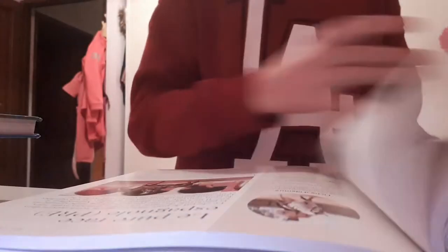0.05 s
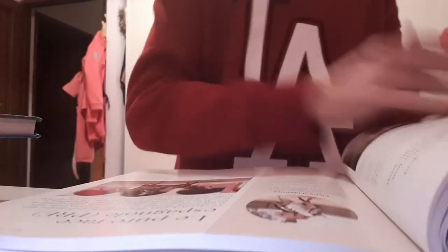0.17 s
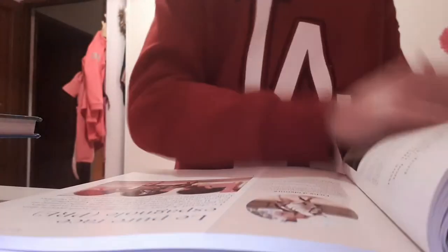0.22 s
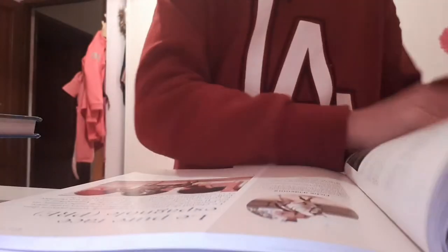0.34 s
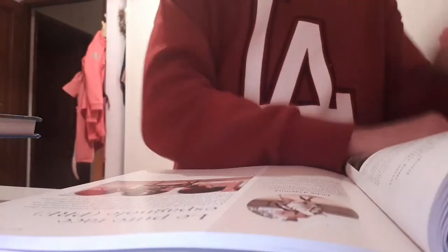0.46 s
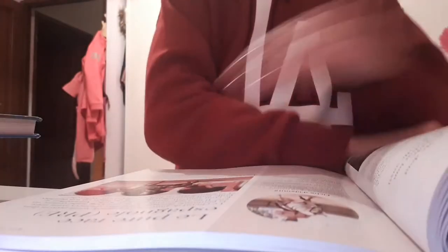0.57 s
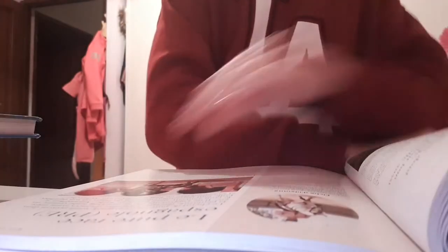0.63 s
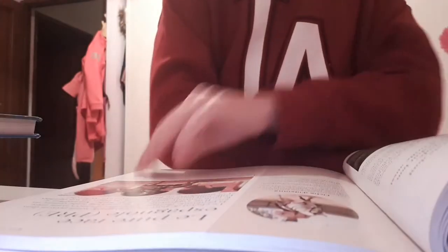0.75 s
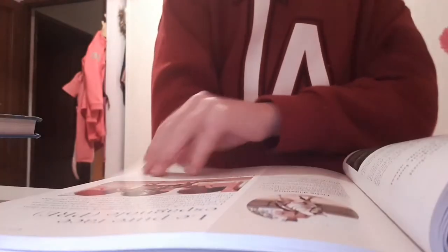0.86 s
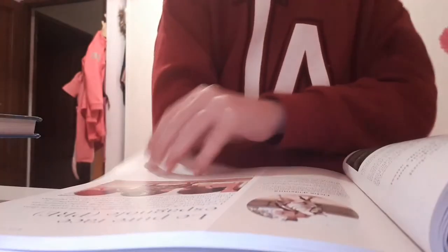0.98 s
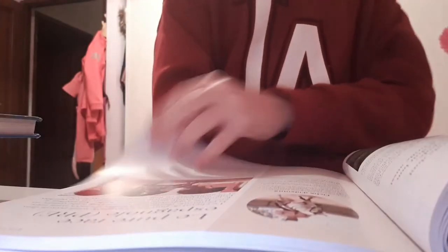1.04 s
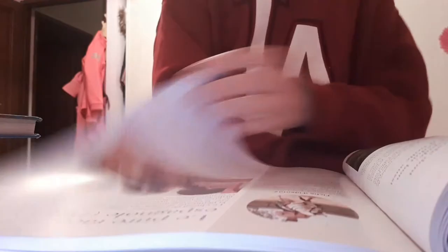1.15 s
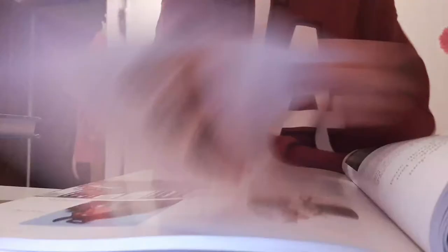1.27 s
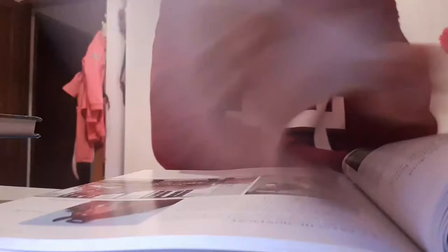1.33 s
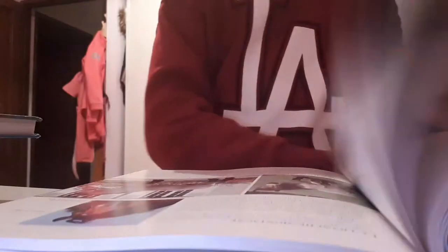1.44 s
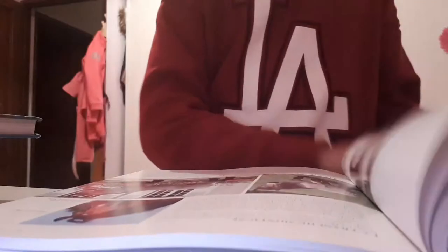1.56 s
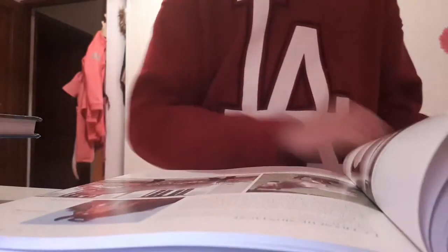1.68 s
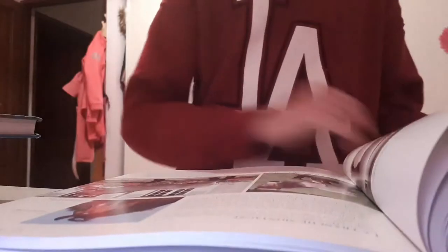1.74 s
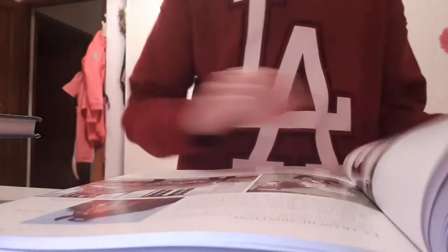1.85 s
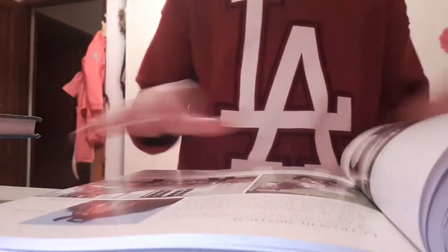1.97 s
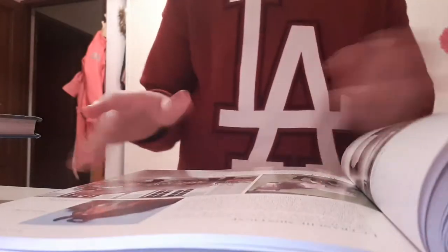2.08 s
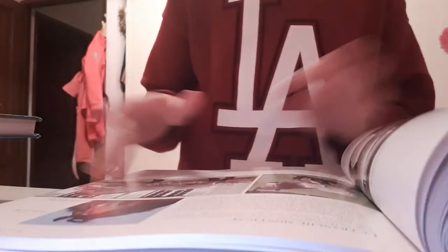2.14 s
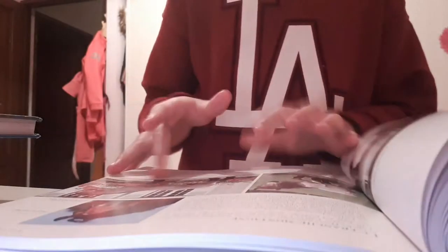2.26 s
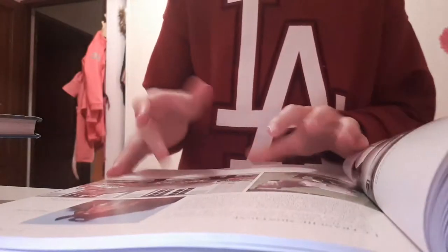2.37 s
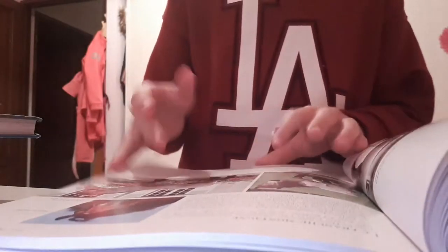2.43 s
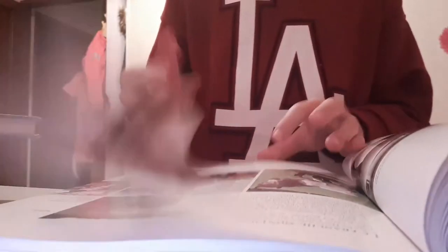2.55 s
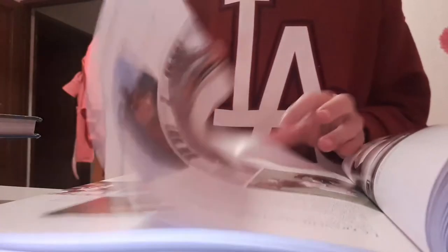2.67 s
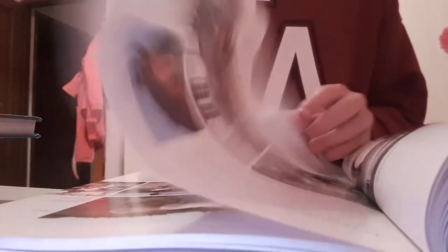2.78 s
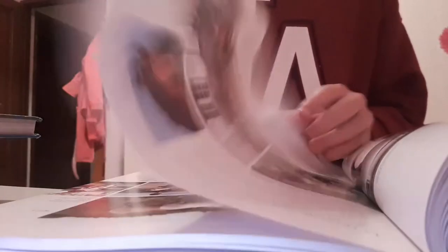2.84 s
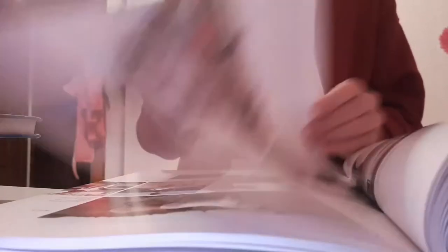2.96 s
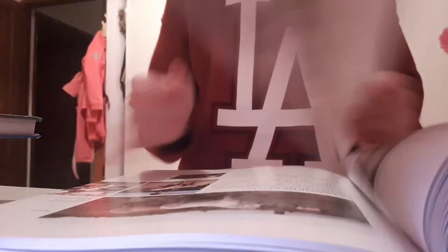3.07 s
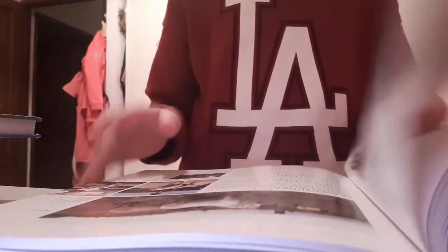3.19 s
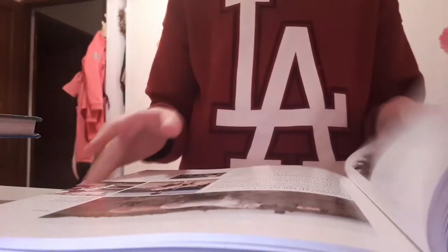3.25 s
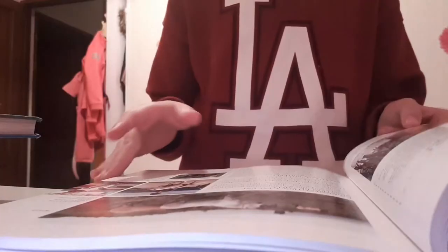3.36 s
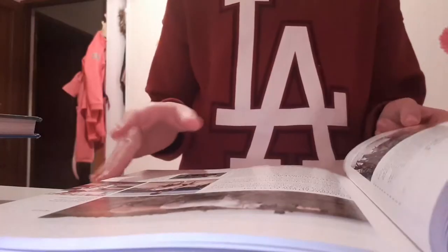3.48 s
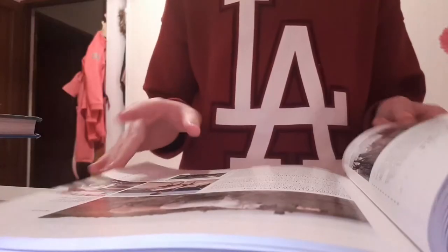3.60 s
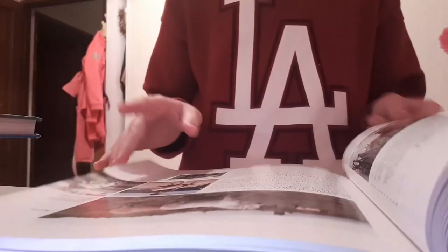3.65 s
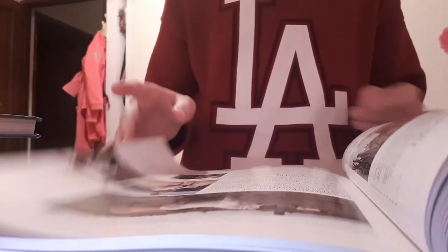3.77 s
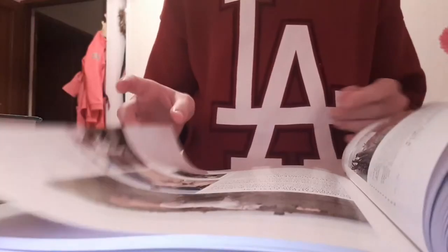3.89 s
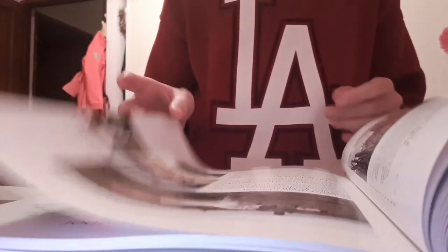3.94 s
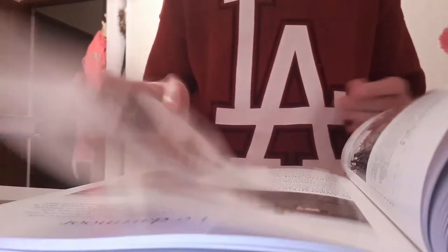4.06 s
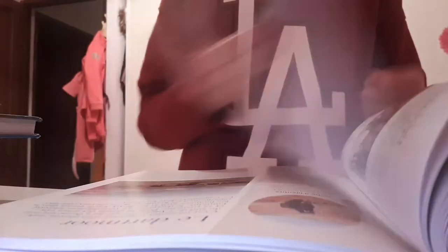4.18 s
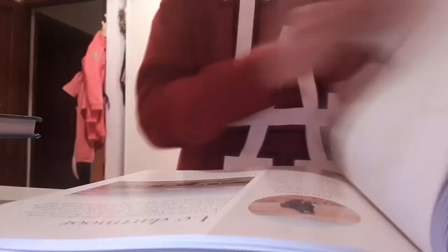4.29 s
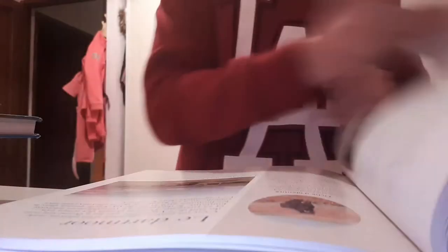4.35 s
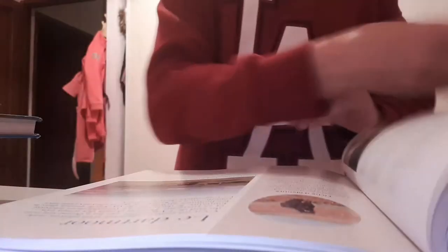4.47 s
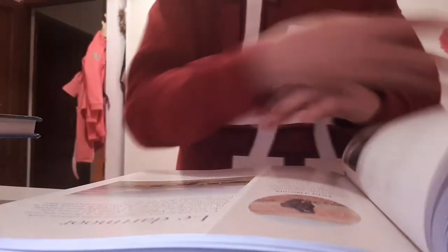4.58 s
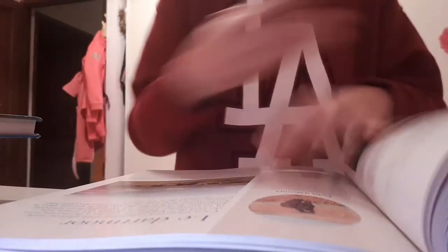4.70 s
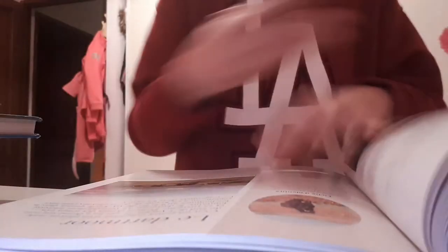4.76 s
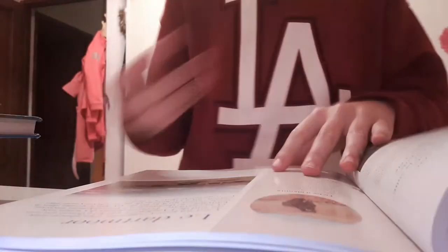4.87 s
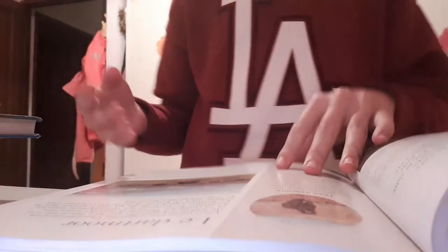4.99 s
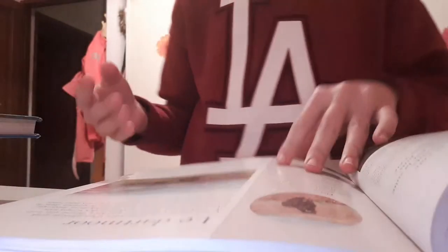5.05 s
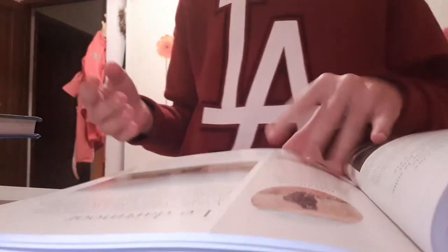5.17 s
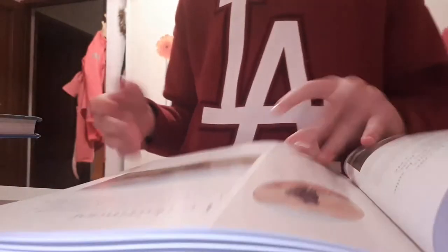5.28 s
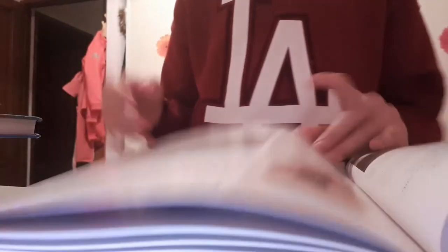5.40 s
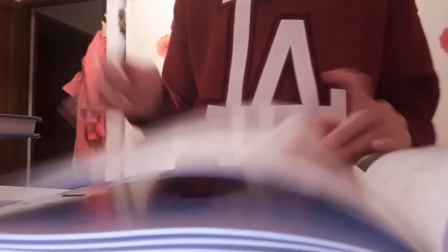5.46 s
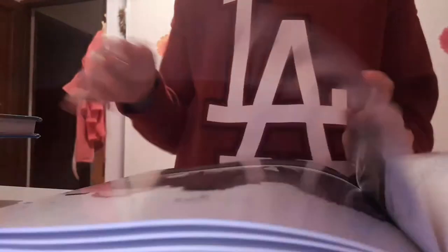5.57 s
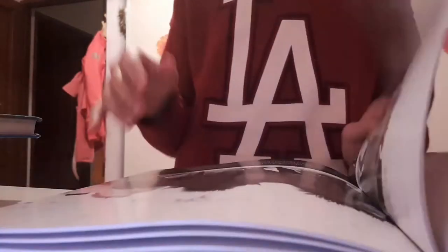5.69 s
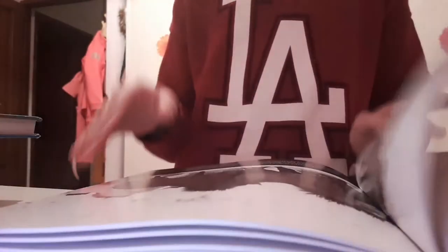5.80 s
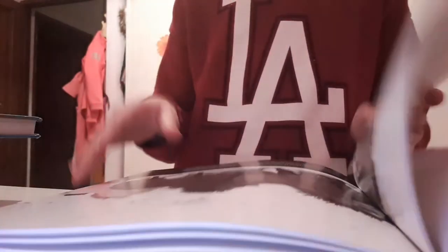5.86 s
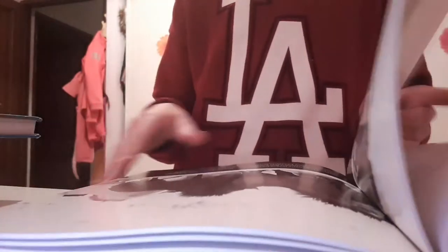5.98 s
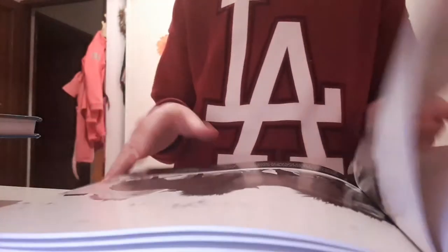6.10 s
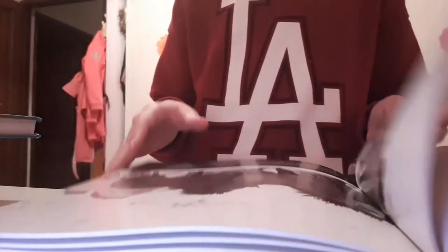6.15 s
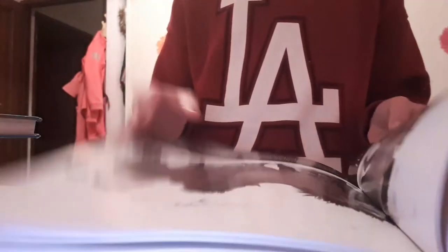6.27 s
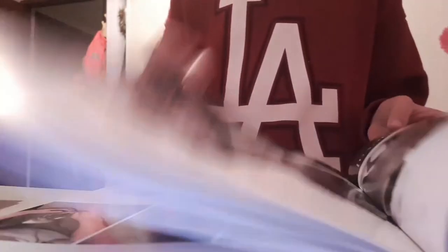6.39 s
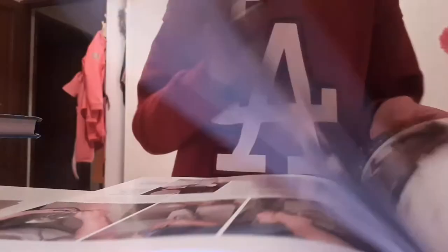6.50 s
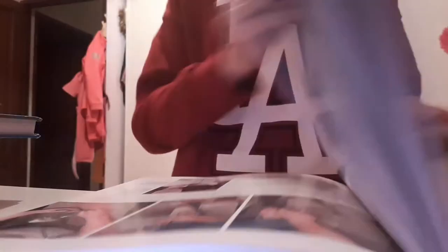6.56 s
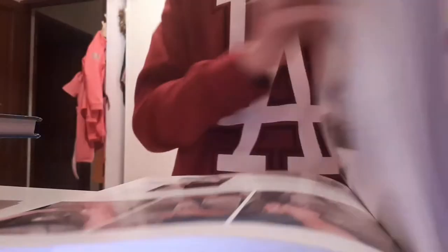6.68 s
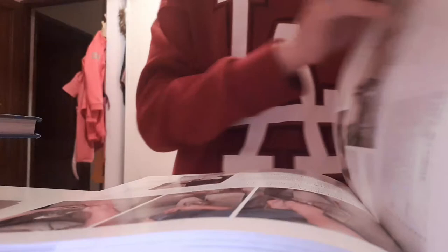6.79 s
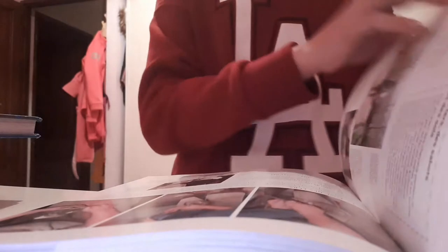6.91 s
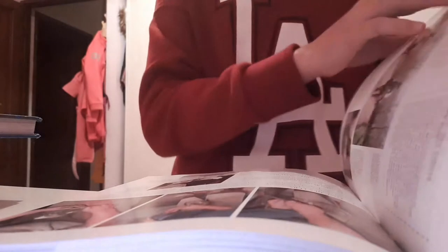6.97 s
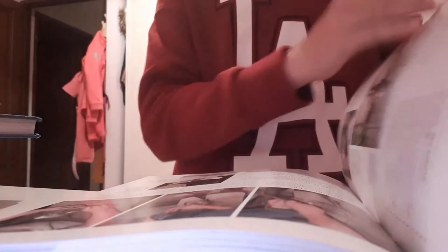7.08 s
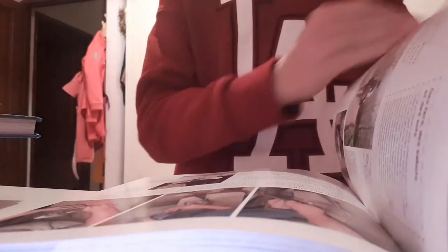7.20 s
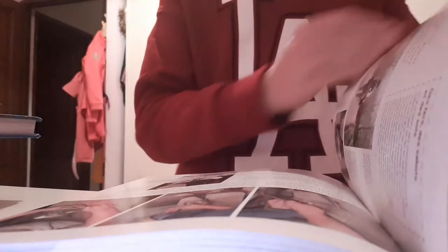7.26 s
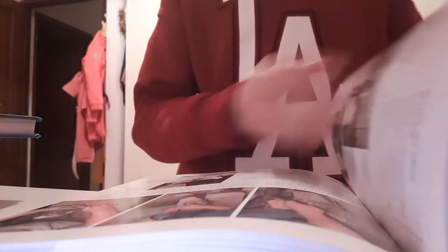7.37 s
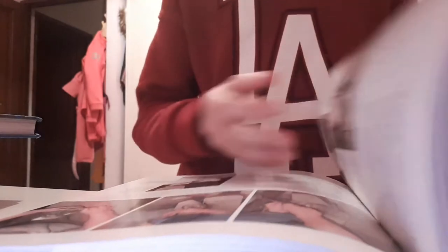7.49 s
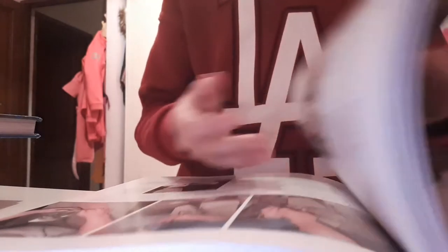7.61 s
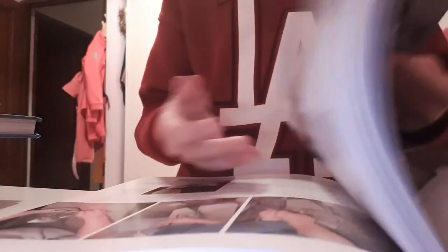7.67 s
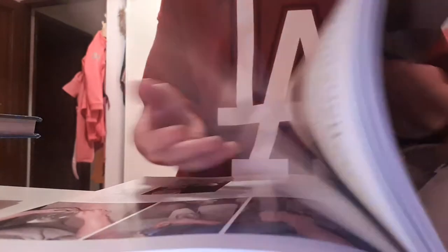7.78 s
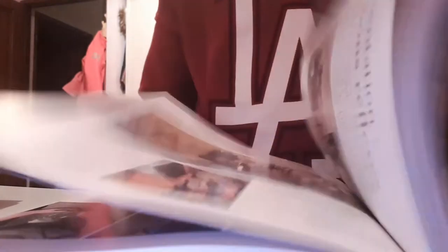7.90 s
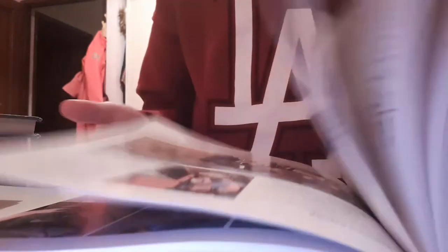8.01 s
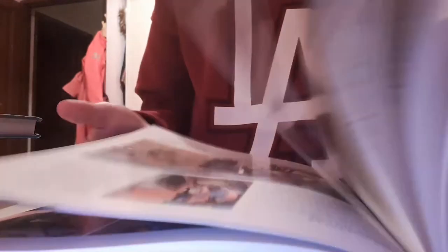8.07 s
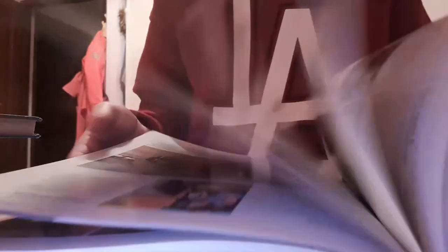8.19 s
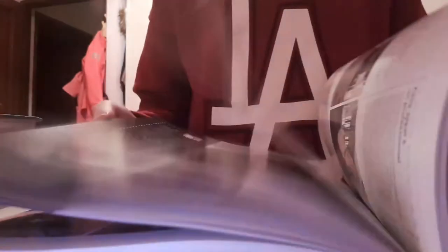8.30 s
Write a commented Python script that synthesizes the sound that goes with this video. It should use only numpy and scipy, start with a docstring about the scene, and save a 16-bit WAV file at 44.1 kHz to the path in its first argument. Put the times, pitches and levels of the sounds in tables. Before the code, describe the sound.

Large glossy book pages are turned by hand close by, with rustles, papery pops, crisp snaps, soft thuds and brief finger squeaks in a small room.

```python
"""Leafing through a glossy book

Someone leafs through a thick glossy book on a table in a small room, close to a two-port microphone.
Sheets slide and rustle (coloured friction noise), buckle with dull pops (short noise volleys) and snap
at their creases (ringing cracks); hands and falling pages thud on the stack (brief low tones with air).
Fingers squeak (gliding unsteady tones) and judder (kicked page resonances) over the coated paper."""
import sys
import numpy as np
from scipy import signal
from scipy.fft import rfft, irfft
from scipy.io import wavfile

SR = 44100
rng = np.random.default_rng(int(sys.argv[2]) if len(sys.argv) > 2 else 0)


def store_pcm(level_fs):
    """Save levels as 16-bit WAV."""
    pcm = np.round(np.clip(level_fs, -1, 1) * 32767).astype(np.int16)
    wavfile.write(sys.argv[1], SR, np.atleast_2d(pcm).T)


N = 367794
TIME = np.arange(N) / SR


def from_db(db):
    """Decibels to gain."""
    return 10 ** (np.asarray(db) / 20)


def rms_one(x):
    """Scale to rms 1."""
    return x / np.sqrt(np.mean(x ** 2) + 1e-20)


def in_time(rows):
    """The columns of a curve at every sample."""
    times, *columns = np.transpose(rows)
    return [np.interp(TIME, times, column) for column in columns]


def at_hz(points, hz):
    """Read a table along log frequency."""
    f, value = np.transpose(points)
    return np.interp(np.log(hz + 1e-3), np.log(f), value)


def colour(x, spectrum):
    """Give a steady sound a spectrum; rms 1."""
    gain = from_db(at_hz(spectrum, np.fft.rfftfreq(N, 1 / SR)))
    return rms_one(irfft(rfft(x) * gain, N))


def cut(x, hz, kind, order=2):
    """Butterworth filter."""
    return signal.sosfilt(signal.butter(order, hz, kind, fs=SR, output="sos"), x)


def resonate(x, hz, width_hz):
    """One resonance with gain 1 on top."""
    r = np.exp(-np.pi * width_hz / SR)
    zeros = np.array([1, 0, -1]) * (1 - r * r) / 2
    poles = [1, -2 * r * np.cos(2 * np.pi * hz / SR), r * r]
    return signal.lfilter(zeros, poles, x)


def drift(per_s, size):
    """Smooth random wander with spread near 1, through per_s knots a second."""
    knots = rng.standard_normal(size // 20 + 2)
    return np.interp(np.arange(size) * per_s / SR, np.arange(len(knots)), knots)


def place(x, pan_db, lead_s=.00034, full_db=5.5, even_db=0.5):
    """Two microphone ports: the one nearer to a sound hears it louder and earlier."""
    n = np.arange(len(x))
    # both ports hear it at once at even_db; the lead is full from full_db further to either side
    lag = lead_s * SR * np.clip((pan_db - even_db) / full_db, -1, 1)
    left, right = [np.interp(n - np.round(np.maximum(d, 0)), n, x) for d in (-lag, lag)]
    ratio = from_db(pan_db)
    return np.array([left * ratio, right]) * np.sqrt(2 / (1 + ratio ** 2))


def add(out, s, sound):
    """Mix a stereo sound in at a time."""
    i = int(np.clip(round(s * SR), 0, N - 1))
    out[:, i:i + sound.shape[1]] += sound[:, :N - i]


# where the hands work, on the left of the book but for two turns on the right:
# (time [s], left over right [dB])
HAND_SIDE = [(0, 13), (1.1, 12.5), (2.6, 10.5), (3.3, 10), (3.85, -11.5), (4.02, 2), (4.55, 7.5),
             (5.15, 8.5), (5.35, 36), (5.6, 1), (6.8, 12), (7.6, -1.5), (8.2, 3)]


def side_db(s):
    """How far left the hands are at a moment."""
    return np.interp(s, *np.transpose(HAND_SIDE))


# colour of the quiet room: (frequency [Hz], relative density [dB per Hz])
QUIET_COLOUR = [(25, -20), (60, -1), (125, 5.5), (200, -9), (430, -10), (700, -13.5), (1200, -15),
                (3700, -22), (14300, -25.5), (15500, -24.5)]
QUIET_DB = -68  # rms


def quiet(bass_hz=450, apart=0.56):
    """Faint room rumble, mostly alike at both ports, under an even hiss of their own."""
    shared = cut(rng.standard_normal(N), bass_hz, "low", order=1)
    own = cut(rng.standard_normal((2, N)), bass_hz, "high", order=1)
    own = own + apart * rng.standard_normal((2, N))
    return from_db(QUIET_DB) * colour(shared + own, QUIET_COLOUR)


# the room's decay: (frequency [Hz], time to fall by 60 dB [s])
ROOM_DECAY = [(100, 0.33), (400, 0.25), (1500, 0.26), (6000, 0.19), (15000, 0.32)]
# the room's low resonances: (frequency [Hz], width [Hz], gain [dB])
ROOM_RESONANCES = [(130, 16, -3), (228, 24, -5)]


def room(x, wet_db=-7.0, first_s=0.0037, alike_hz=300, bass_alike=0.72):
    """Diffuse reflections decay band by band, partly alike at both ports in the bass; two low modes ring."""
    t, edges = TIME[:SR // 2], np.geomspace(60, 16000, 9)
    tail = 0
    for low, high in zip(edges, edges[1:]):
        hz = np.sqrt(low * high)
        alike = bass_alike / (1 + (hz / alike_hz) ** 2)
        shared = np.sqrt(alike) * rng.standard_normal(len(t))
        own = np.sqrt(1 - alike) * rng.standard_normal((2, len(t)))
        decay = np.exp(-np.log(1000) * t / at_hz(ROOM_DECAY, hz))
        tail = tail + cut(shared + own, [low, high], "band") * decay
    # silent until first_s, full at twice that
    tail = tail * np.clip(t / first_s - 1, 0, 1)
    tail = tail / np.sqrt(np.sum(tail ** 2) / 2)
    source = 0.54 * x[0] + 0.53 * x[1]
    modes = sum(from_db(db) * resonate(source, hz, width) for hz, width, db in ROOM_RESONANCES)
    reflections = signal.fftconvolve(source[None], tail, axes=1)[:, :N]
    return from_db(wet_db) * reflections + modes


# a hand or a page lands on the stack: (time [s], relative level [dB], pitch [Hz])
LANDINGS = [(0.064, -39.5, 116), (0.884, -56, 110), (1.297, -40.5, 128), (1.366, -32.5, 205),
            (1.384, -31.5, 102), (1.424, -39.5, 122), (1.604, -38.5, 135), (2.03, -48, 107),
            (2.399, -48.5, 134), (2.634, -42.5, 258), (2.889, -41.5, 190), (2.992, -37, 125),
            (3.094, -40.5, 137), (3.275, -52.5, 134), (4.009, -35, 95), (4.275, -41.5, 161),
            (4.529, -28, 123), (4.827, -42, 123), (4.865, -42, 133), (5.509, -36.5, 131),
            (5.588, -35.5, 137), (5.767, -54.5, 128), (5.976, -55, 135), (6.133, -48.5, 119),
            (6.156, -38.5, 112), (6.681, -47.5, 77), (6.805, -47.5, 73.5), (6.907, -52, 79),
            (7.635, -45.5, 96)]


def thuds(length_s=0.0059, puff=0.31, level_db=-0.5, size=9000):
    """A soft push rocks the book briefly and squeezes a puff of air from between its pages."""
    out, t = np.zeros((2, N)), TIME[:size]
    age = t / length_s
    push = age * np.exp(1 - age)
    for s, db, hz in LANDINGS:
        air = rms_one(cut(rng.standard_normal(size), [50, 340], "band"))
        thud = push * (np.sin(2 * np.pi * hz * t) + puff * air)
        add(out, s, place(cut(thud, 28, "high") * from_db(db + level_db), 1.0))
    return out


# a fingertip squeaks:
# (time [s], length [s], first pitch [Hz], last pitch [Hz], level [dB], left over right [dB])
FINGER_SQUEAKS = [(5.156, 0.076, 858, 828, -43, -2), (5.233, 0.049, 797, 716, -46, 2.5),
                  (5.295, 0.081, 1386, 1282, -48.5, 20), (6.241, 0.138, 896, 970, -53.5, 15),
                  (6.592, 0.1145, 629, 915, -61, -1)]


def squeaks(jitter=0.08, rough_db=4.0, overtone_db=-21):
    """Skin sticks and slips on the gloss at an unsteady pitch."""
    out, size = np.zeros((2, N)), SR // 5
    for s, length, first_hz, last_hz, db, pan_db in FINGER_SQUEAKS:
        u = np.minimum(TIME[:size] / length, 1)  # share of the squeak gone by
        hz = (first_hz + (last_hz - first_hz) * u) * (1 + jitter * drift(605, size))
        phase = 2 * np.pi * np.cumsum(hz) / SR
        swell = (1 - np.exp(-60 * u)) * np.sqrt(1 - u)
        grip = swell * from_db(db + rough_db * drift(317, size))
        tone = np.sin(phase) + from_db(overtone_db) * np.sin(2 * phase)
        add(out, s, place(grip * tone, pan_db))
    return out


# a finger judders over the page in two pushes: (time [s], slips [per s], level [dB])
FINGER_JUDDER = [(5.317, 330, -66), (5.322, 300, -42), (5.355, 220, -37), (5.40, 320, -47),
                 (5.45, 330, -49), (5.475, 250, -62), (5.50, 170, -44), (5.565, 190, -42),
                 (5.585, 260, -66)]
# the page's resonances under that finger: (frequency [Hz], width [Hz], relative gain [dB])
PAGE_RESONANCES = [(288, 225, 14.5), (746, 140, 10.5), (1320, 70, -19), (2140, 67, -17), (2670, 42, 2.5),
                   (3550, 300, -8)]


def judder(jitter=0.08, grit=0.04, skin_hz=3600):
    """A firmer finger slips in slow jerks; each jerk kicks the page's resonances and scrapes a little."""
    per_s, db = in_time(FINGER_JUDDER)
    cycles = np.cumsum(per_s * (1 + jitter * drift(200, N))) / SR
    kicks = np.diff(np.floor(cycles), prepend=0)
    scrape = grit * cut(rng.standard_normal(N), 670, "high") * np.exp(-2.5 * (cycles % 1))
    drive = scrape - kicks
    page = sum(from_db(mode_db) * resonate(drive, hz, width) for hz, width, mode_db in PAGE_RESONANCES)
    page = rms_one(cut(page, [100, skin_hz], "band"))
    touching = (TIME > FINGER_JUDDER[0][0]) & (TIME < FINGER_JUDDER[-1][0])
    return place(touching * from_db(db) * page, 6.5)


# a sheet buckles: (time [s], relative level [dB], pitch [Hz], decay time [s])
SHEET_BUCKLES = [(0.001, -26.5, 1600, 0.012), (0.019, -29.5, 940, 0.013), (0.33, -41.5, 720, 0.014),
                 (1.016, -38, 860, 0.0053), (1.068, -33, 760, 0.0062), (1.3065, -30.5, 815, 0.0032),
                 (1.363, -34, 434, 0.013), (1.597, -35.5, 534, 0.01), (2.63, -24, 1030, 0.0078),
                 (2.643, -33, 530, 0.015), (2.82, -40, 603, 0.0087), (2.991, -33, 766, 0.006),
                 (3.042, -38, 690, 0.01), (3.074, -35, 830, 0.0089), (4.008, -23.5, 970, 0.0074),
                 (4.283, -30, 1230, 0.006), (4.585, -30, 380, 0.011), (4.606, -33, 408, 0.012),
                 (4.689, -38, 396, 0.014), (5.105, -32, 390, 0.0094), (5.489, -33.5, 730, 0.014),
                 (5.5544, -30, 650, 0.0047), (6.193, -32.5, 870, 0.0037), (6.231, -33.5, 880, 0.0049),
                 (6.286, -38, 740, 0.0084), (6.884, -53, 517, 0.015), (7.634, -27.5, 920, 0.0061),
                 (7.641, -28.5, 560, 0.0066), (8.031, -46, 916, 0.0095), (8.059, -39.5, 903, 0.0068),
                 (8.083, -44, 1120, 0.01), (8.115, -40.5, 725, 0.0063)]


def buckles(body_hz=210, reach=1.755, ring_db=5.0, level_db=-8.5, size=6000):
    """A bend runs through the sheet in a quick volley of small pops; a tighter bend sounds higher."""
    out, t = np.zeros((2, N)), TIME[:size]
    for s, db, hz, length in SHEET_BUCKLES:
        age = t / length
        swell = (1 - np.exp(-2.2 * age)) * np.exp(-age)
        volley = rng.standard_normal(size) * swell / swell.max()
        pop = cut(cut(volley, body_hz, "high"), hz * reach, "low", order=5)
        ring = cut(resonate(volley, hz, hz * 0.22), hz * 1.3, "low")
        pop = rms_one(pop + from_db(ring_db) * ring) * volley.std()
        add(out, s, place(pop * from_db(db + level_db), side_db(s)))
    return out


def crinkles(count=2, ring_db=5.5, crack_db=0.0, spread_db=9, low_hz=1500, high_hz=3600):
    """Every stroke sets off a few small random snaps, stronger where it grazes; rows like CREASE_SNAPS."""
    rows = []
    for s, length, db, bright_db in STROKE_LIST:
        for when, weak, tight in rng.random((count, 3)):
            start = s + length * (when - RISE_SHARE)
            ring = db + bright_db / 2 + ring_db - spread_db * weak
            crack = db + bright_db + crack_db - spread_db * weak
            rows.append((start, ring, crack, low_hz * (high_hz / low_hz) ** tight))
    return rows


# a crease or an edge snaps: (time [s], ring peak [dB], crack peak [dB], ring pitch [Hz])
CREASE_SNAPS = [(0.006, -31.5, -62.5, 2640), (0.509, -45, -59, 1970), (1.375, -39.5, -41, 1880),
                (1.585, -56, -33.5, 3000), (1.607, -35, -46, 2700), (2.417, -40, -42, 1760),
                (2.504, -48, -42, 2760), (2.592, -31.5, -48, 2220), (2.598, -27.5, -44, 2420),
                (2.6253, -44, -44, 1900), (2.658, -43, -42, 1870), (2.8766, -46, -37.5, 2430),
                (2.8892, -44, -46, 2180), (2.991, -39.5, -49, 2000), (3.1, -39.5, -65, 1860),
                (3.856, -40.5, -54, 1500), (3.883, -40, -56, 1530), (4.148, -51, -53, 1790),
                (4.172, -38.5, -45, 1730), (4.181, -41, -52, 1820), (4.22, -58, -42, 1990),
                (4.267, -36.5, -29, 4740), (4.528, -38, -41.5, 1760), (5.59, -33, -42.5, 1570),
                (6.14, -49.5, -47, 2020), (6.3105, -37.5, -48.5, 1950), (6.888, -48.5, -60, 2600),
                (7.631, -63, -45.5, 1500), (8.088, -75, -49.5, 1860), (8.122, -55, -42.5, 4500),
                (8.192, -66.5, -49.5, 5030)]


def snaps(rise_s=0.00059, length_s=0.0019, top_hz=8200, air_db=-15, size=1500):
    """A crease flips over: a sharp crack and a brief ring of the stiff paper around it."""
    out, t = np.zeros((2, N)), TIME[:size]
    swell = (1 - np.exp(-t / rise_s)) * np.exp(-t / length_s)
    for s, ring_db, crack_db, hz in list(CREASE_SNAPS) + crinkles():
        flip = rng.standard_normal(size) * swell
        ring = cut(resonate(flip, hz, hz * 0.29), hz * 1.3, "low")
        crack = cut(flip, top_hz, "low", order=8) + from_db(air_db) * flip
        crack = cut(crack, 1270, "high", order=1)
        snap = from_db(ring_db) * ring / np.abs(ring).max()
        snap = snap + from_db(crack_db) * crack / np.abs(crack).max()
        add(out, s, place(snap, side_db(s) + 3.0))
    return out


def slips(per_s, spread_db, size):
    """Tiny catches of paper on paper: random clicks of uneven size."""
    sizes = from_db(spread_db * np.minimum(rng.exponential(1, size), 4))
    return sizes * rng.choice([-1, 1], size) * (rng.random(size) < per_s / SR)


def rustle(spectrum, per_s, spread_db, flutter_db, smooth):
    """Friction: catches and an even rush shake the sheet while the pressure flutters; rms 1."""
    drive = rms_one(slips(per_s, spread_db, N)) + smooth * rng.standard_normal(N)
    return rms_one(colour(drive, spectrum) * from_db(flutter_db * drift(90, N)))


def air_gap(x, hz, echo):
    """Sound bounces in the wedge of air between two sheets and rings at multiples of one pitch."""
    loop = np.zeros(int(SR / hz) + 1)
    loop[0], loop[-1] = 1, -echo
    return signal.lfilter([np.sqrt(1 - echo ** 2)], loop, x)


# colours of the sliding paper, four tables: (frequency [Hz], relative density [dB per Hz])
FLAP_COLOUR = [(30, -37), (60, -6), (125, 4.5), (170, 1), (230, 1.5), (330, -12), (600, -44)]
FLEX_COLOUR = [(40, -50), (180, -13.5), (300, 3.5), (450, 5.5), (600, 0), (820, 6), (1150, -6.5),
               (1900, -36)]
RUB_COLOUR = [(800, 10), (1350, 11.5), (1750, 8), (2150, 4), (2900, -1.5), (4000, -19), (6500, -47)]
HISS_COLOUR = [(2200, -7.5), (3800, -1.5), (5500, -2.5), (7800, -0.5), (8600, -20), (12000, -10.5),
               (15500, -25)]
# a stroke that grazes the next sheet is bright, one that only moves air is dull:
# (offset from the stroke's level [dB], slope [dB per dB of brightness])
FLAPPING, FLEXING, RUBBING, EDGE_HISS = (0, -0.27), (1.14, -0.53), (-5.5, 0.56), (-10.5, 0.79)
# a dull stroke bends the sheet widely: the top of its flexing falls with its brightness
BEND_HZ, BEND_DB_PER_OCTAVE = 1020, 7.5
# a sheet on the left swings nearer to the microphone and pushes more air at it:
# flapping dB per dB of left-right, counted from the usual place
NEARNESS_DB, USUAL_SIDE_DB = 1.1, 6
RISE_SHARE = 0.43  # of a stroke's length; the rest is its fall
# a sheet slides or swings: (time at the height [s], length [s], relative level [dB], brightness [dB])
STROKE_LIST = [(0.003, 0.14, -46, -5.5), (0.12, 0.052, -61.5, 15), (0.203, 0.096, -61, 6),
               (0.379, 0.14, -56.5, 5.5), (0.49, 0.096, -55, 2.5), (0.625, 0.12, -61, -12.5),
               (1.039, 0.057, -49.5, 6), (1.098, 0.059, -52.5, 20), (1.169, 0.07, -53.5, 3.5),
               (1.281, 0.14, -59, 4), (1.393, 0.14, -51.5, -13), (1.607, 0.059, -48.5, 2.5),
               (1.687, 0.067, -63, 11), (2.046, 0.077, -69, 1.5), (2.277, 0.039, -61, -6),
               (2.466, 0.17, -59.5, 1.5), (2.593, 0.057, -59, 8.5), (2.658, 0.12, -54, 0.5),
               (2.83, 0.039, -58, 12), (2.885, 0.061, -52, 8.5), (2.979, 0.1, -53.5, -4.5),
               (3.097, 0.14, -55.5, -2), (3.27, 0.21, -71, 9), (3.781, 0.041, -68.5, 17),
               (4.04, 0.081, -50, 0), (4.238, 0.18, -53.5, 4), (4.42, 0.037, -82.5, 23),
               (4.52, 0.06, -53, 0.5), (4.597, 0.062, -50.5, -0.5), (4.688, 0.092, -54, -8),
               (4.842, 0.11, -60, -5.5), (5.087, 0.036, -59, 8), (5.121, 0.023, -47.5, 5),
               (5.17, 0.19, -57, -1.5), (5.362, 0.087, -47.5, 5), (5.448, 0.029, -50.5, -3),
               (5.527, 0.15, -51, -2.5), (5.665, 0.036, -48.5, -26.5), (6.172, 0.14, -61.5, 4),
               (6.327, 0.16, -64, 5.5), (6.44, 0.1, -66.5, 1.5), (6.656, 0.13, -65, 2.5),
               (6.803, 0.049, -62.5, 7), (7.257, 0.49, -85.5, -7), (7.665, 0.12, -56.5, -1),
               (7.804, 0.045, -70.5, 22.5), (8.094, 0.094, -59.5, -2.5), (8.205, 0.051, -65, 9.5)]


def sheets(gap_hz=730, gap_echo=0.29, gap_spread=0.078):
    """Each stroke swells and fades: the sheet flaps, its bends flex, its face rubs and its edge hisses."""
    flap = rustle(FLAP_COLOUR, per_s=600, spread_db=2.2, flutter_db=2.0, smooth=0.7)
    flex = rustle(FLEX_COLOUR, per_s=860, spread_db=2.5, flutter_db=4.0, smooth=0.31)
    rub = rustle(RUB_COLOUR, per_s=1200, spread_db=1.0, flutter_db=4.5, smooth=0.99)
    hiss = rustle(HISS_COLOUR, per_s=4300, spread_db=4.0, flutter_db=2.1, smooth=0.54)
    out = np.zeros((2, N))
    for s, length, db, bright_db in STROKE_LIST:
        rise, fall = length * RISE_SHARE, length * (1 - RISE_SHARE)
        flap_db, flex_db, rub_db, hiss_db = [
            db + own_db + slope * bright_db
            for own_db, slope in (FLAPPING, FLEXING, RUBBING, EDGE_HISS)]
        flap_db += NEARNESS_DB * (min(side_db(s), USUAL_SIDE_DB) - USUAL_SIDE_DB)
        span = slice(max(0, int((s - 3 * rise) * SR)), int((s + 3 * fall) * SR) + 2)
        t = TIME[span] - s
        speed = np.exp(-(t / np.where(t < 0, rise, fall)) ** 2)
        bends = cut(flex[span], BEND_HZ * 2 ** (bright_db / BEND_DB_PER_OCTAVE), "low", order=1)
        paper = from_db(flex_db) * bends + from_db(rub_db) * rub[span] + from_db(hiss_db) * hiss[span]
        stroke_gap_hz = gap_hz * np.exp(gap_spread * rng.standard_normal())
        paper = air_gap(speed * paper, stroke_gap_hz, gap_echo)
        # the long waves of the flapping reach both ports almost alike
        out[:, span] += place(paper, side_db(s)) + place(speed * from_db(flap_db) * flap[span], 0)
    return out


def scene():
    """The book and the hands in their room."""
    book = sheets() + buckles() + snaps() + thuds() + squeaks() + judder()
    return book + room(book) + quiet()


CUTOFF_HZ = 15700


def record(dry, widen=0.53, widen_hz=260, width_hz=200):
    """The recorder widens the stereo image in the low middle; the top is cut steeply."""
    side = widen * resonate((dry[0] - dry[1]) / 2, widen_hz, width_hz)
    top_cut = signal.ellip(10, .1, 80, CUTOFF_HZ, fs=SR, output="sos")
    return signal.sosfilt(top_cut, dry + [side, -side])


dry = scene()
out = record(dry)
store_pcm(out)
```